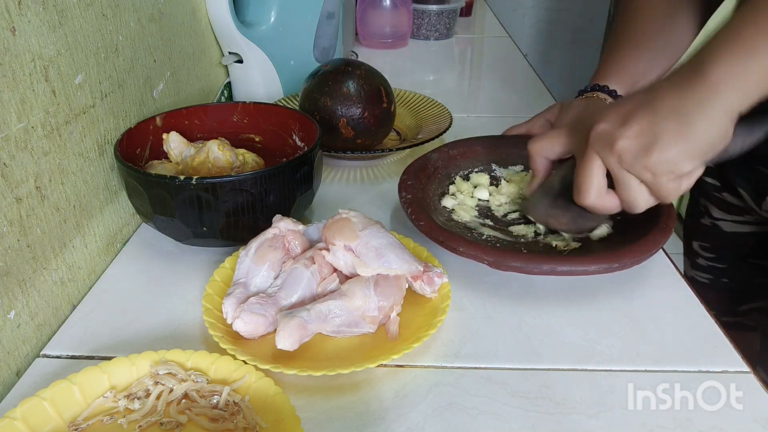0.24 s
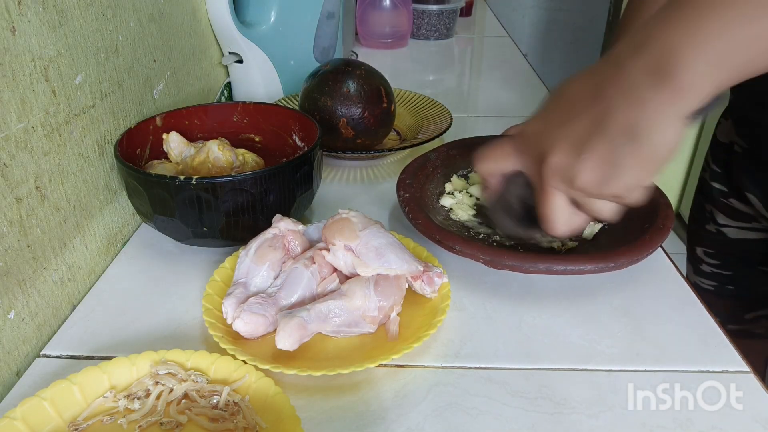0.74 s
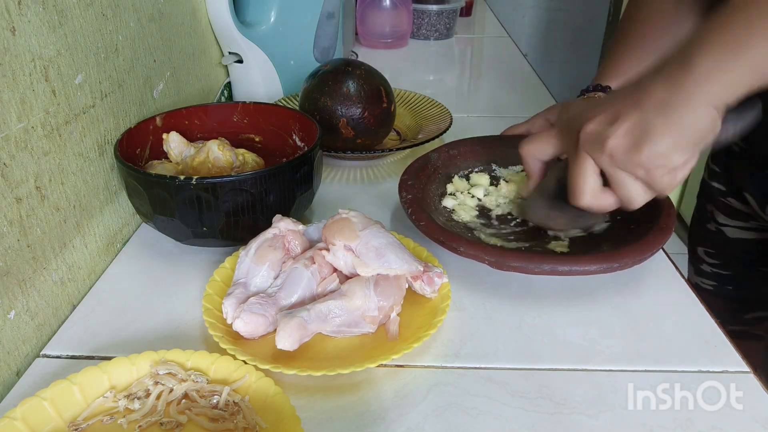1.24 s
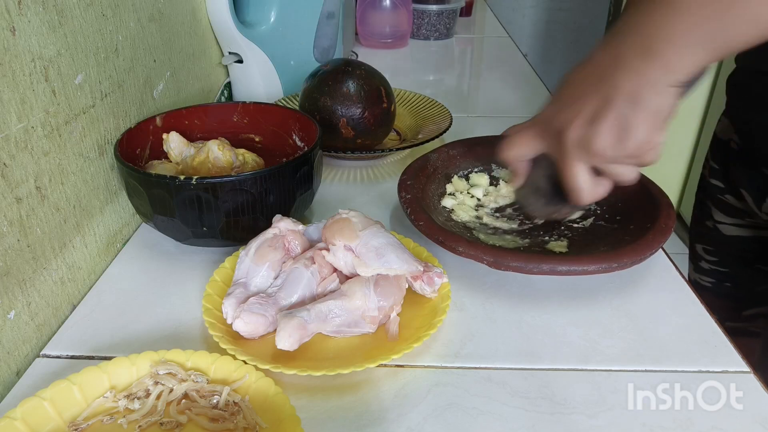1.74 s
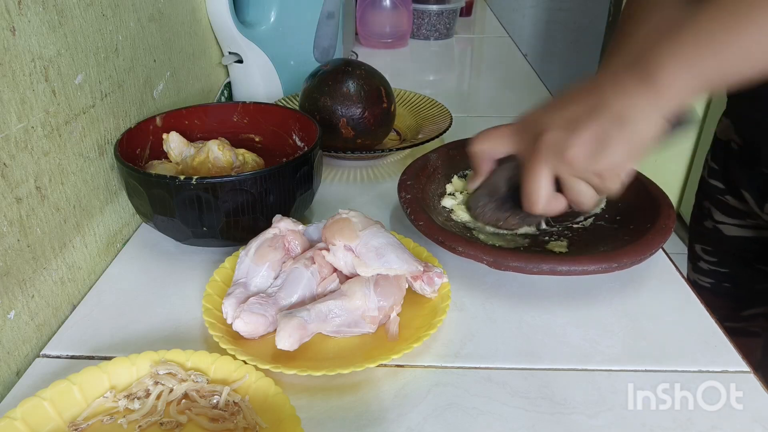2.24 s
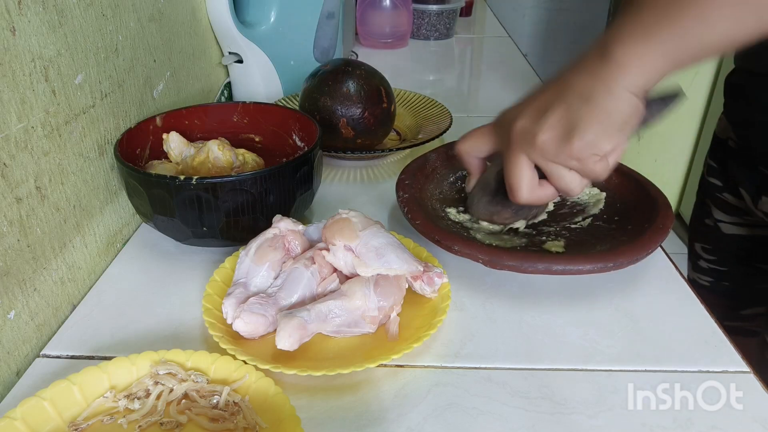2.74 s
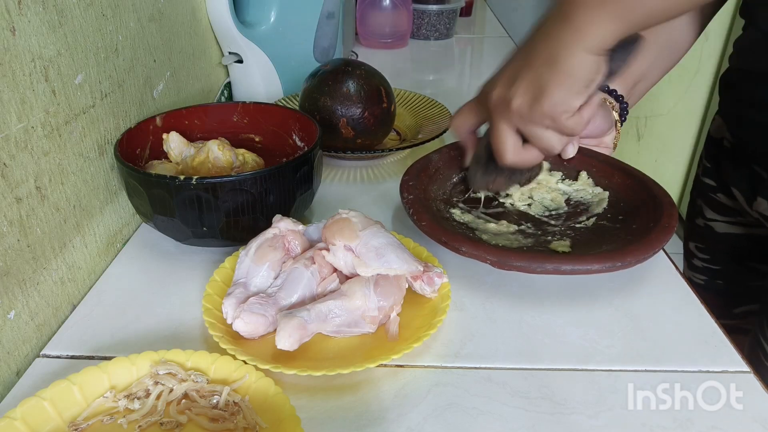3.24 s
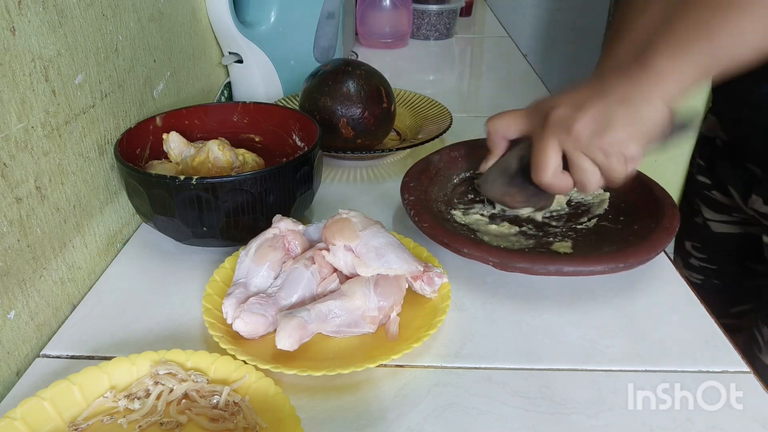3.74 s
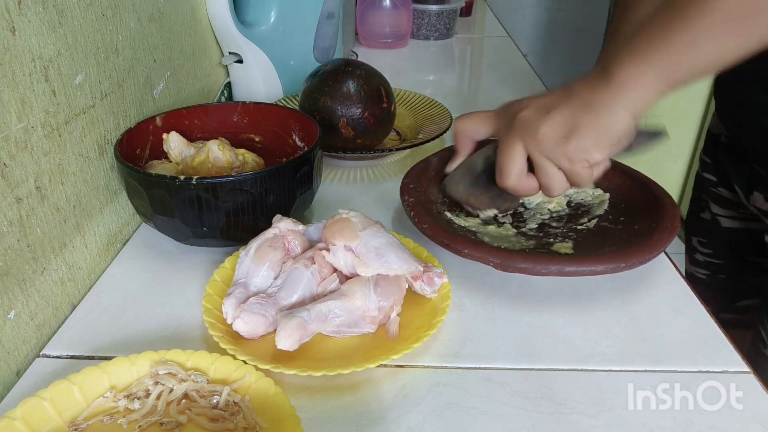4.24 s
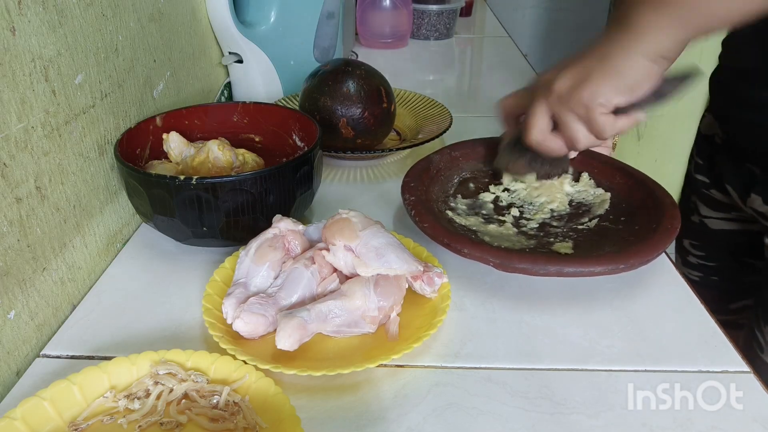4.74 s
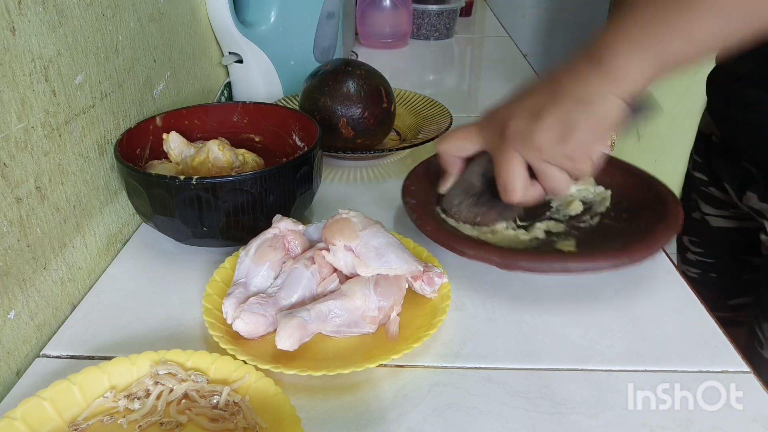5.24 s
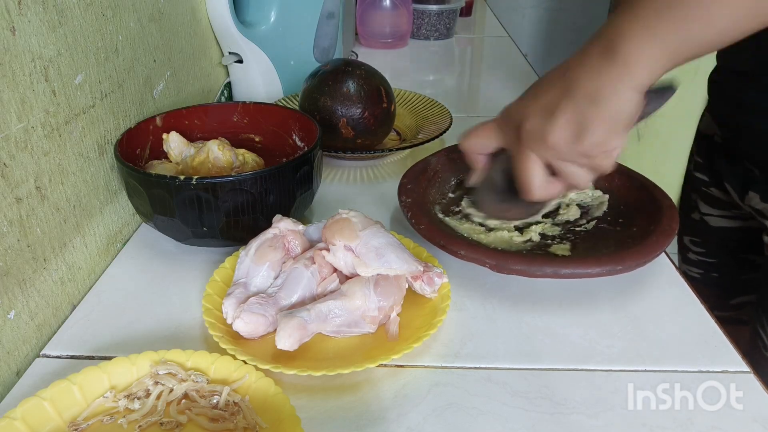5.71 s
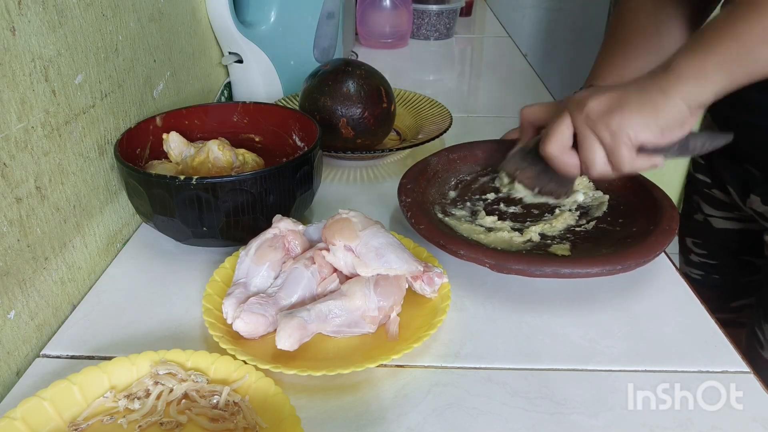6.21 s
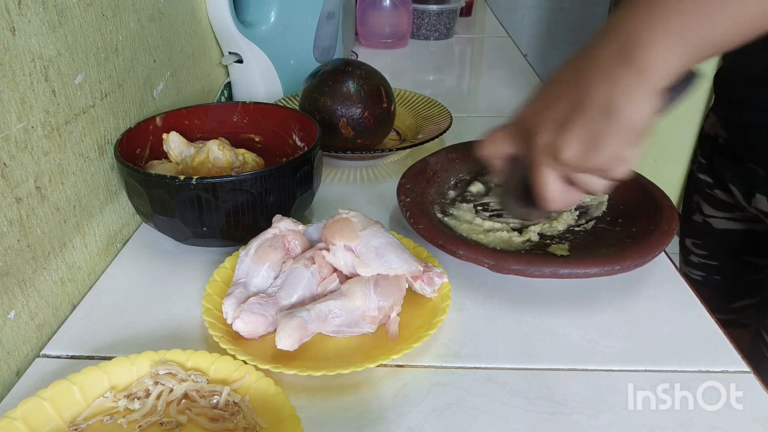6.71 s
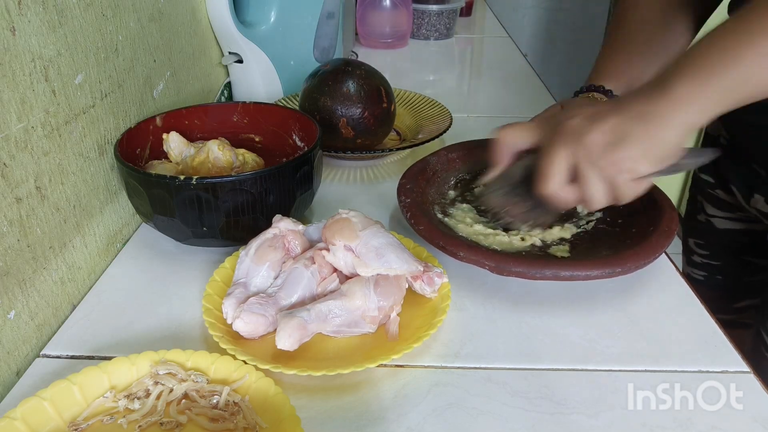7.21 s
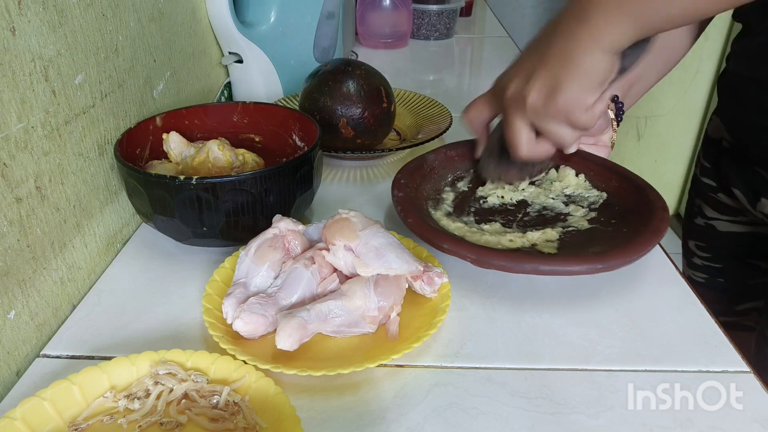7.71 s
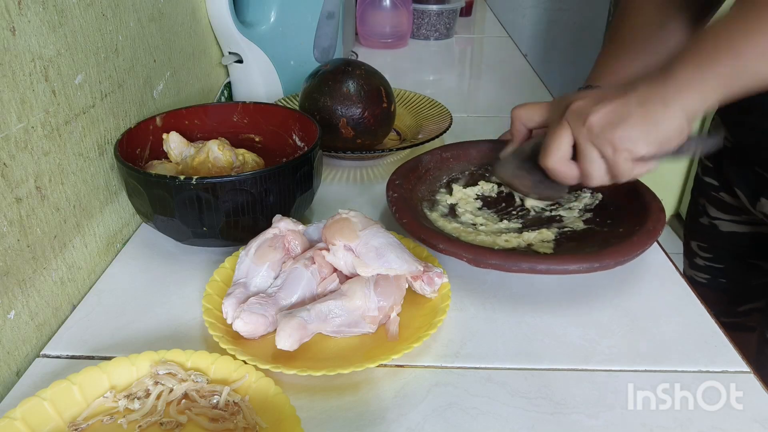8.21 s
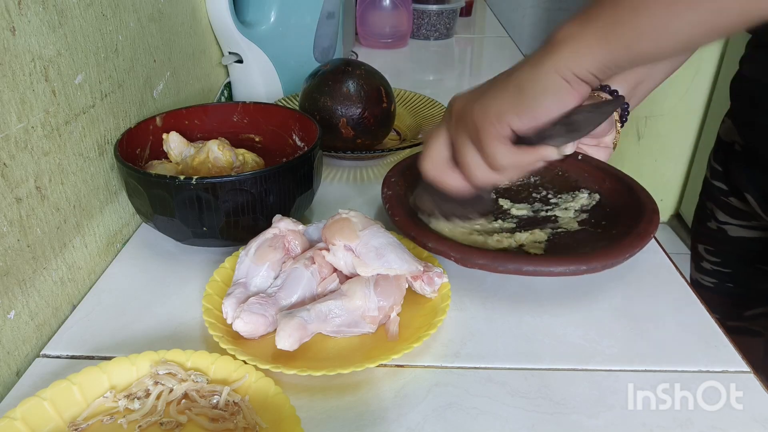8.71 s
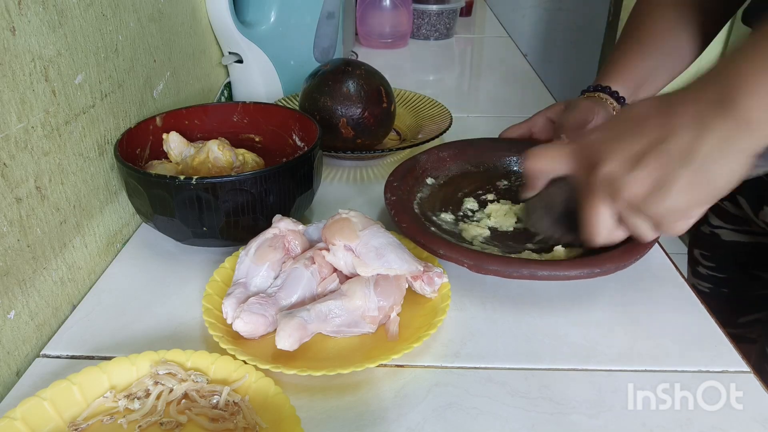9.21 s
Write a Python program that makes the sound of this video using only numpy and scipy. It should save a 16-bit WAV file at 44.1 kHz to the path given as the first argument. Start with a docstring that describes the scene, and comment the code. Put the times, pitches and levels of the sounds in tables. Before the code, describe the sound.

Dry, brittle stone-on-clay rasps open at once and continue in a restless, irregular rhythm to the end. A sharp knock lands around two and a half seconds, heavier blows near five, then denser scraping with clustered clicks and thin squeaks after eight. Paste smears softly beneath. Two close microphones, slightly right-leaning brightness, small hard room.

```python
"""A hand pestle grinds garlic and ginger on a shallow earthenware dish on a tiled kitchen counter.
Stick-slip friction, made of random tiny impulses, gives gritty scrapes, bursts and soft smearing; rolls over the
paste add a hollow gliding resonance. Decaying sines make clicks, noise bands make squeaks, pulses squelch, and
knocks excite the dish's modes while the counter thuds. Each contact reaches two close microphones
through the dish, the tiles and a small room, over quiet room tone."""
import sys
import numpy as np
from scipy import signal
from scipy.fft import rfft, irfft
from scipy.io import wavfile

SR = 44100
rng = np.random.default_rng(int(sys.argv[2]) if len(sys.argv) > 2 else 0)


def waveform_to_disk(signal):
    """Save audio, clipped to [-1, 1], as 16-bit WAV at the path in sys.argv[1]."""
    frames = np.transpose(np.atleast_2d(signal))
    scaled = np.clip(frames, -1, 1) * 32767
    samples = np.round(scaled).astype(np.int16)
    wavfile.write(sys.argv[1], SR, samples)


N = 417186
TAPS = 2048  # samples of a colouring filter

# In all event tables the levels are relative and the starts precede any lag of the function.
# centres of the contact's body, crunch, grit and hiss: hz
CONTACT_HZ = [400, 1100, 3400, 8500]
# the pestle is off the paste: from_s, to_s
LIFTS = [(.72, 0.85), (2.3, 2.45), (3.34, 3.43), (6.75, 6.83)]


def db_to_gain(db):
    """Amplitude ratio: 20 dB is a factor of ten."""
    return 10 ** (np.asarray(db) / 20)


def unit_energy(x):
    """Energy normalisation: the squares sum to 1."""
    return x / np.sqrt(np.sum(x ** 2, axis=-1, keepdims=True) + 1e-18)


def clock(seconds):
    """Uniform sampling: the sample times of a short sound."""
    return np.arange(int(seconds * SR) + 2) / SR


def fade(t, t60):
    """Exponential damping: the level falls by 60 dB in t60 seconds."""
    return np.exp(-np.log(1000) * t / t60)


def add(track, start, sound):
    """Superposition: mix a sound in at its start time, in seconds."""
    i = int(np.clip(start * SR, 0, N - 1))
    track[..., i:i + sound.shape[-1]] += sound[..., :N - i]


def colour(x, hz, gain):
    """Minimum-phase filtering: a folded cepstrum makes the gain curve causal."""
    f = np.maximum(np.fft.rfftfreq(TAPS, 1 / SR), 1)
    log_gain = np.log(np.interp(np.log(f), np.log(hz), gain))
    cepstrum = irfft(log_gain)
    cepstrum[1:TAPS // 2] *= 2
    cepstrum[TAPS // 2 + 1:] = 0
    impulse_response = irfft(np.exp(rfft(cepstrum)))
    return signal.fftconvolve(x, impulse_response)


def shape(x, points):
    """Linear filtering by a table of frequency (Hz) and level (dB), at unchanged length."""
    hz, db = np.transpose(points)
    return colour(x, hz, db_to_gain(db))[:len(x)]


def walk(t, rate):
    """Slow random modulation: normal random levels, rate per second, joined by straight lines."""
    return np.interp(t * rate, np.arange(256), rng.standard_normal(256))


def grains(t, rate, spread_db, catch_rate, catch_db):
    """Stick-slip of rough stone: random impulses, a few far larger, bunched by catching; rms 1."""
    chance = rng.random((3, SR))[:, :len(t)]
    size = db_to_gain(-spread_db * np.log(np.maximum(chance[0], .004)))
    sign = np.sign(chance[2] - .5)
    slips = (chance[1] < rate / SR) * size * sign
    bunching = db_to_gain(catch_db * walk(t, catch_rate))
    return unit_energy(slips * bunching) * np.sqrt(len(t))


def radiate(force, ring_db, tiles_db=4, tiles_t60=0.019, room_db=-1.5, room_t60=0.25,
            shared_hz=400, place_db=2.5, grip_detune=0.015):
    """Modal radiation and reverberation: each contact wakes the modes and meets the tiles in its own way."""
    # mean ringing of dish and pestle, kept for 93 ms: pitch_hz, t60_s, relative level_db
    ringing = [(149.2, 0.35, -20.5), (222.6, 0.3, -16), (298, 0.11, -16), (398, 0.25, -16),
               (464.3, 0.11, -8.5), (844, 0.35, -21.5), (1011, 0.094, -17.5), (1590, 0.17, -31),
               (1950, 0.096, -12.5), (2110, 0.12, -19), (2862, 0.15, -8), (4024, 0.024, -9),
               (5470, 0.0084, -7.5)]
    t = clock(.3)
    hz, t60, db = np.transpose(ringing)[:, :, None]
    # the hands shift each mode by a small share of its pitch
    hz = hz * (1 + grip_detune * rng.standard_normal(hz.shape))
    ring_t = t[:TAPS * 2]
    modes = unit_energy(np.cos(2 * np.pi * hz * ring_t) * fade(ring_t, t60))
    mode_gain = db_to_gain(db + ring_db + place_db * rng.standard_normal(db.shape))
    ring = np.sum(modes * mode_gain, axis=0)
    direct = (t == 0) + np.pad(ring, (0, len(t) - len(ring)))
    # long waves reach both microphones alike, short ones scatter differently
    low, high = (signal.butter(4, shared_hz, kind, fs=SR) for kind in ("low", "high"))
    early, late = rng.standard_normal((2, 2, len(t)))
    diffuse = signal.lfilter(*low, rng.standard_normal(len(t))) + signal.lfilter(*high, late)
    tiles = unit_energy(signal.lfilter(*high, early * fade(t, tiles_t60)))
    room_onset = np.minimum(t / 0.00064, 1)
    room = unit_energy(diffuse * fade(t, room_t60) * room_onset)
    # the dish stands to the right, so the left microphone hears it two samples later
    response = np.array([np.r_[0, 0, direct[:-2]], direct])
    response = response + db_to_gain(tiles_db) * tiles + db_to_gain(room_db) * room
    return signal.fftconvolve(force[None], unit_energy(response), axes=1)


def click(hz, t60, crumble=0.6):
    """Damped impact: the contact rings for an instant while a grain crumbles into noise."""
    t = clock(.03)
    dust = np.diff(rng.standard_normal(len(t) + 1)) * hz / CONTACT_HZ[2]
    return (np.sin(2 * np.pi * hz * t) + crumble * dust) * fade(t, t60)


def crackle(pressure, rate=170, spread_db=3.5, t60=0.0034, low_hz=1800, high_hz=6000):
    """Random brittle fracture: grit cracks at uneven moments, each grain with its own size and pitch."""
    out = np.zeros(N)
    gap, size, pitch = rng.random((3, 56))
    starts = np.cumsum(-np.log(gap)) / rate
    for start, s, p in zip(starts, size, pitch):
        gain = db_to_gain(-spread_db * np.log(max(s, .08)))
        add(out, start, gain * click(low_hz * (high_hz / low_hz) ** p, t60))
    return out[:len(pressure)] * pressure


def scratches(pressure, rate=80, length_s=0.012, low_hz=1400, high_hz=6000,
              glide=0.11, spread_db=2.5, rough=0.092):
    """Frequency-modulated friction: single dragged grains rasp briefly, each at its own gliding pitch."""
    out = np.zeros(len(pressure) + SR)
    gap, size, pitch, bend = rng.random((4, 24))
    starts = np.cumsum(-np.log(gap)) / rate
    t = clock(length_s)
    along = t / t[-1]
    wobble = rough * np.cumsum(rng.standard_normal((len(gap), TAPS)), axis=1)[:, :len(t)]
    for start, s, p, b, w in zip(starts, size, pitch, bend, wobble):
        if start * SR < len(pressure):
            hz = low_hz * (high_hz / low_hz) ** p * (1 + glide * (2 * b - 1) * along)
            rasp = np.sin(2 * np.pi * np.cumsum(hz) / SR + w) * np.sin(np.pi * np.sqrt(along))
            add(out, start, db_to_gain(-spread_db * np.log(max(s, .1))) * rasp)
    return out[:len(pressure)] * pressure


def stroke(length, crest, contact_db, resonances, grain_db=3.0, catch_db=2.0, snap_db=-10, crackle_db=1,
           scratch_db=-9, bite_s=0.0011, release_s=0.011, place_colour_db=3, resonance_width=0.085):
    """Sliding friction: stone on clay, duller and smoother on paste, with ginger fibres snapping throughout."""
    t = clock(min(length + 5 * release_s, .9))
    # it bites, swells to a crest, eases and lets go; pressures are shares of the crest's
    crest_s = np.clip(crest, .1, .95) * length
    pressure = np.interp(t, [0, min(bite_s, crest_s / 2), crest_s, length], [0, .35, 1, .44])
    pressure = pressure * np.exp(-np.maximum(t - length, 0) / release_s)
    body_db, _, grit_db, hiss_db = contact_db
    bare = np.clip(2.0 + (grit_db - body_db) / 30, .3, 1.2)  # how much bare stone touches
    hz = np.geomspace(300, 14000, 128)
    db = np.interp(np.log(hz), np.log(CONTACT_HZ), contact_db)
    for centre, lift_db in resonances:
        db = db + lift_db * np.exp(-(np.log(hz / centre) / resonance_width) ** 2)
    # the pestle travels from one place on the dish to another, and each favours frequencies of its own
    travel, friction = np.minimum(t / length, 1), 0
    for share in (1 - travel, travel):
        slips = grains(t, rate=6000, spread_db=grain_db * bare, catch_rate=207.7, catch_db=catch_db * bare)
        place = db_to_gain(db + place_colour_db * rng.standard_normal(len(hz)))
        force = colour(slips * pressure * np.sqrt(share), hz, place)
        friction = friction + radiate(force, ring_db=-7.5)
    grit = db_to_gain(crackle_db) * crackle(pressure) + db_to_gain(scratch_db) * scratches(pressure)
    add(friction, 0, radiate(grit * db_to_gain(grit_db), ring_db=-6.5, tiles_db=2.0))
    snaps = grains(t, rate=590, spread_db=1.5, catch_rate=55.3, catch_db=8.0)
    snaps = snaps * db_to_gain(snap_db + (grit_db + hiss_db) / 2)
    snap_force = colour(snaps * pressure, CONTACT_HZ, db_to_gain([-7.0, -30.0, 6.5, 4.5]))
    return friction + radiate(snap_force, ring_db=-3, tiles_db=24.0)


def scraping(lean_crunch=0.38):
    """Resonant dry friction: leaning adds body, wet paste adds hiss, the pestle's tilt picks a resonance."""
    # drags across the dish: start_s, length_s, crest (share of length), level_db,
    # extra body from leaning lean_db, extra hiss from wet paste wet_db, resonance tilt_hz, its height tilt_db
    scrapes = [(0, 0.05, 0.94, 13.5, -6, -1, 4130, 9.5), (0.115, 0.1, 0.51, -13, 6.5, 10, 3070, 13),
               (0.23, 0.066, 0.47, -9, 1.5, 8, 3100, 13), (0.301, 0.12, 1, -1, 4.5, 1, 3180, 12),
               (0.483, 0.087, 0.73, 5, -18, -5, 3650, 6), (0.597, 0.12, 0.24, 0.0, -3.5, 2.5, 3830, 7),
               (0.992, 0.089, 1, 2, 2, -2, 3200, 9), (1.283, 0.1, 0.87, -1.5, -5, 5, 3170, 3.0),
               (1.603, 0.097, 0.38, 6.0, -8.5, -4, 4970, 2), (1.739, 0.068, 0.66, 8, -6, -1, 3920, 7),
               (1.892, 0.11, 0.37, 0.5, -7.5, -0.5, 1510, 8), (2.041, 0.057, 0.56, 1.5, 1, 4.5, 3800, 2),
               (2.499, 0.1, 0.64, -3.5, 1, 10, 6460, 7), (2.679, 0.037, 1, -6, -10, 8, 2320, 3),
               (2.801, 0.016, 0.74, -2.0, -9, 0, 2140, 18), (2.967, 0.097, 0.46, -2, -22, -8, 3900, 12),
               (3.518, 0.06, 0.96, 4.5, -3, 7.5, 4660, 6), (3.639, 0.14, 0.4, -10.5, 4, -1, 2620, 9),
               (3.808, 0.07, 0.22, 8.0, -18, -9, 2450, 10.5), (4.162, 0.084, 1, 4, -10.5, 3.5, 3320, 6),
               (4.329, 0.089, 0.42, 6, -1.5, -9, 4550, 3.5), (4.481, 0.059, 0.71, 8, -26, -8, 2440, 7),
               (4.895, 0.028, 0.74, 16.5, -7.5, -3, 2780, 10.5), (4.965, 0.15, 0.75, 3, -10.5, -2, 2850, 1),
               (5.158, 0.14, 0.35, -5, -5.5, 4, 2440, 4.5), (5.303, 0.099, 0.19, 8.5, -4.5, -16, 1660, 9),
               (5.4, 0.041, 0.43, -0.5, -9, -11, 4630, 9), (5.582, 0.08, 0.99, 12.5, -14, -14.5, 2230, 11),
               (5.742, 0.063, 0.35, 5, -14, -10, 2880, 8.5), (5.861, 0.094, 1, 8, -14.5, -9, 1520, 4.0),
               (6.253, 0.062, 0.97, 9, -14.5, -11, 3280, 13), (6.415, 0.043, 0.81, 6, -15, -8, 1810, 2),
               (6.578, 0.062, 0.33, 7, -23, -7.5, 1800, 13), (6.906, 0.09, 0.58, 6.0, -8, -3.5, 2080, 7.5),
               (7.045, 0.083, 0.8, 3.0, 0, -1.5, 3900, 1), (7.208, 0.091, 0.42, -2.5, -5.5, 4.5, 2350, 12),
               (7.342, 0.099, 0.77, 7, -4.5, -8.5, 1980, 3), (7.474, 0.11, 0.73, 0.5, 1, -0.5, 3900, 6.5),
               (7.902, 0.038, 0.87, 2.5, -2, 4.5, 4630, 10), (7.946, 0.078, 0.55, 13, -10.5, -7, 1620, 8),
               (8.097, 0.074, 0.54, 8.5, -6, -5, 1880, 6), (8.216, 0.12, 0.19, 6.5, -7, -15.5, 6160, 3),
               (8.413, 0.082, 1, -2.5, -0.5, -3.5, 1830, 10), (8.589, 0.11, 0.87, 5, 0.5, -16, 3240, -7),
               (8.689, 0.12, 0.68, 6, 3, -19, 5340, 1), (8.777, 0.14, 0.4, 3, -9, -6.5, 5470, -9),
               (8.985, 0.13, 0.63, -6.5, -2, -1, 3240, 13.5), (9.364, 0.15, 0.42, 7.5, -4, -2.5, 2900, 1)]
    # force of a drag: body_db, crunch_db, grit_db, hiss_db
    scrape_force = np.array([-0.3, -1.1, -2, 0.88])
    out = np.zeros((2, N))
    for start, length, crest, db, lean_db, wet_db, tilt_hz, tilt_db in scrapes:
        # part of the extra body also reaches the crunch band
        contact_db = db + scrape_force + [lean_db, lean_crunch * lean_db, 0, wet_db]
        add(out, start, stroke(length, crest, contact_db, [(tilt_hz, tilt_db)]))
    return out


def smearing(waver_db=1.5, waver_rate=18, lift_s=0.013):
    """Continuous friction noise: the pestle smears paste softly except where it is lifted off."""
    # force of the faint sliding: body_db, crunch_db, grit_db, hiss_db
    smear_force = [-16, -29.5, -21, -15]
    t = np.arange(N) / SR
    touch = np.ones(N)
    for up, down in LIFTS:
        touch = touch * np.where(t < down, np.clip((up - t) / lift_s, 0, 1), 1)
    slips = rng.standard_normal(N) * touch * db_to_gain(waver_db * walk(t, waver_rate))
    return radiate(colour(slips, CONTACT_HZ, db_to_gain(smear_force)), ring_db=-6.0)[:, :N]


def kitchen_air(db=-56):
    """Diffuse noise field: a soft, steady room tone, mostly alike on both sides."""
    # spectrum of the still air: frequency_hz, relative level_db (per Hz)
    air = [(30, -4), (100, 5), (160, 7.5), (400, -13), (800, -8), (2500, -23), (6000, -26), (16000, -39)]
    mid, side = (unit_energy(shape(rng.standard_normal(N), air)) * np.sqrt(N) for _ in range(2))
    return db_to_gain(db) * (mid + side * np.array([[.2], [-.2]]))


def thudding(lag=0.00667, t60=.12, foot_t60=0.16, rattle=0.42, gain_db=1):
    """Damped low resonance: the counter answers the rocking dish, whose foot rattles."""
    # the dish rocks: start_s, relative level_db, pitch_hz
    thuds = [(0.01,-35,120), (0.83,-42,115), (1.033,-38,100), (1.348,-34,105), (1.904,-32.5,100),
             (2.228,-38.5,150), (2.516,-29,140), (2.713,-40,110), (3.005,-35,100), (3.305,-32.5,100),
             (3.434,-29.5,115), (3.563,-24,115), (3.813,-39,120), (4.198,-25.5,115), (4.895,-16,100),
             (5.027,-28,130), (5.336,-28,100), (5.462,-29,105), (5.6,-37,125), (6.228,-37,110),
             (6.534,-34.5,130), (7.64,-38,140), (8.259,-42,110), (8.322,-24.5,125), (8.642,-27,186),
             (8.729,-27,196)]
    # spectrum of the foot's rattle: multiple of the thud's pitch, relative level_db (per Hz)
    foot_spectrum = [(.3, -47), (.68, -4.5), (1.4, -7.5), (2.4, -16), (5.5, -33), (18, -55)]
    out, t = np.zeros(N), clock(.3)
    for start, db, hz in thuds:
        note = np.sin(2 * np.pi * hz * t) * fade(t, t60)
        foot = shape(rng.standard_normal(len(t)), np.array(foot_spectrum) * [hz, 1])
        foot = foot / foot.std() * fade(t, foot_t60)
        add(out, start + lag, db_to_gain(db + gain_db) * (note + rattle * foot))
    return out


def catching(grain_db=3.0, bunch_db=0.5, rise_s=0.0029, fade_s=0.011):
    """Sudden stress release: a hard bit is crushed in a quickly fading burst of slips."""
    # hard bits: start_s, level_db, extra hiss wet_db
    catches = [(0.315,12.5,-1), (.994,18.5,3.5), (1.334,15.5,-11), (1.611,22,1.5), (1.771,20,-12),
               (1.907,17.5,3.5), (1.968,12.5,-8), (2.703,19,-5), (2.92,6.5,1), (3.003,12.5,-0.5),
               (3.286,13.5,-2), (3.524,-2,2), (3.733,16.5,-1.5), (3.8175,15,5.5), (4.236,-3,7),
               (4.903,17,-1), (5.206,15,0), (5.448,15,-8), (5.928,-5,-14), (6.57,4.5,11), (6.721,9.5,-12.5),
               (6.908,14,6), (7.231,18,-17), (7.488,19,0), (8.418,-14,19), (8.432,14,-7)]
    # force of a catch: body_db, crunch_db, grit_db, hiss_db
    catch_force = np.array([-9.5, -9.5, -2, -4.5])
    out, t = np.zeros((2, N)), clock(.07)
    pressure = np.minimum(t / rise_s, 1) * np.exp(-t / fade_s)
    for start, db, wet_db in catches:
        slips = grains(t, rate=7400, spread_db=grain_db, catch_rate=375, catch_db=bunch_db)
        burst = unit_energy(slips * pressure) * np.linalg.norm(pressure)
        force = colour(burst, CONTACT_HZ, db_to_gain(db + catch_force + [0, 0, 0, wet_db]))
        add(out, start, radiate(force, ring_db=-9.5, tiles_db=4.5))
    return out


def rub(length, crest, pitches, width):
    """Noise-driven resonance: a band swells to a crest and glides through the pitches as the pestle tilts."""
    t = clock(length)
    course = np.interp(t / length, [0, np.clip(crest, .1, .9), 1], [0, .5, 1])
    hz = np.interp(course, np.linspace(0, 1, len(pitches)), pitches)
    phase = 2 * np.pi * np.cumsum(hz) / SR
    # slow noise on two carriers makes a band whose width is a share of the pitch
    lowpass = signal.butter(2, width * hz.mean() / 2, fs=SR)
    slips = signal.lfilter(*lowpass, rng.standard_normal((2, SR)))[:, TAPS:TAPS + len(t)]
    note = (slips[0] * np.cos(phase) + slips[1] * np.sin(phase)) * np.sin(np.pi * course)
    return radiate(unit_energy(note) * np.sqrt(len(t)), ring_db=-18, tiles_db=-2.0, room_db=-7)


def rolling(gain_db=-2, width=0.25, overtone_width=0.58, arch_ratio=1.12, overtone_ratio=2.15):
    """Cavity resonance: the gap under a rolling pestle sounds a hollow note and overtone, gliding with the push."""
    # rolls over the paste: start_s, length_s, crest (share of length), friction_db, relative note_db,
    # first_hz, last_hz, overtone_db (against the note)
    rolls = [(0.36,0.11,0.37,-15,-24.5,334,231,-7), (0.467,0.1,0.17,-14,-11.5,526,343,-8),
             (0.872,0.094,0.85,-16,-33,420,377,6), (1.144,0.11,0.87,1.5,-15,441,522,2),
             (1.423,0.13,0.41,1.5,-12.5,341,412,-1), (1.748,0.084,0.51,-15,-12.5,398,279,-33),
             (2.165,0.14,0.52,-4,-15,287,307.6,0), (2.834,0.065,0.28,-3,-17.5,574,417,-1),
             (3.187,0.14,0.62,-11.5,-16,321.7,534,3), (3.897,0.17,.6,-1,-16.5,402,481.5,5),
             (4.616,0.17,0.69,0.5,-19,421.5,505.5,8.5), (6.009,0.12,0.55,-2,-21.5,398,554,5.5),
             (6.109,0.16,0.21,-3.5,-22,527,352,-6), (7.617,0.15,0.17,-6.5,-23,370,431,1),
             (8.755,0.2,0.38,-12,-14.5,520.4,402,7), (9.158,0.18,0.46,-8.5,-22.5,321,379,-17)]
    # force of a roll: body_db, crunch_db, grit_db, hiss_db
    roll_force = np.array([-4.5, -8, -2, -4])
    # dip and resonances of the rolling contact: pitch_hz, level_db
    roll_resonances = [(2330, -8), (3850, 2), (5350, 0.5)]
    out = np.zeros((2, N))
    for start, length, crest, friction_db, note_db, first_hz, last_hz, overtone_db in rolls:
        arch = np.array([first_hz, arch_ratio * (first_hz + last_hz) / 2, last_hz])
        note = rub(length, crest, arch, width)
        overtone = rub(length, crest, overtone_ratio * arch, overtone_width)
        note = note + db_to_gain(overtone_db) * overtone
        add(out, start, stroke(length, crest, friction_db + roll_force, roll_resonances))
        add(out, start, db_to_gain(note_db + gain_db) * note)
    return out


def clicking():
    """Impact excitation: the pestle slips off a grain and clicks on bare clay."""
    # start_s, level_db, pitch_hz, t60_s
    clicks = [(.841,-5,4600,0.034), (1.9711,17.5,5460,0.01), (2.4407,17,955,0.0048), (2.444,12,4830,0.012),
              (2.923,6,4200,0.0073), (0.9712,9.5,5120,0.012), (1.3375,10.5,3080,0.0091),
              (1.89,11,5400,0.0038), (1.912,15,4470,0.0066), (0.423,3,5500,0.0037), (3.465,-3,3900,.008),
              (0.8405,3,1300,.006), (5.032,11,980,0.0091), (5.537,2,1300,.006), (8.51,8,4200,.004),
              (8.5135,5,1180,0.0059), (8.4175,7,5000,.006), (3.535,25,4950,0.0037), (3.8205,15,4170,0.013),
              (4.237,19,3300,0.0056), (4.502,10,3720,0.0037), (4.5073,16,4360,0.009), (4.53,17,4020,0.0048),
              (4.895,28,3380,0.012), (5.3385,29.5,1540,0.0046), (5.4663,16.5,1010,0.0078),
              (5.646,6,2670,0.006), (6.5725,12,3090,0.0069), (6.91,14.5,2700,0.0025),
              (6.9653,14,3960,0.0045), (8.4383,-3,2740,.007), (8.607,14,4190,.005),
              (8.612,16.5,4330,0.0044), (8.6205,13,3400,0.0065), (8.629,19,4350,.005),
              (8.6457,15,2940,.006), (8.662,19.5,3200,0.007), (8.725,19.5,2900,0.0059),
              (8.949,6,2900,0.015), (9.071,7,3360,0.0062)]
    out = np.zeros((2, N))
    for start, db, hz, t60 in clicks:
        sound = db_to_gain(db) * click(hz, t60)
        add(out, start, radiate(sound, ring_db=-15.5, tiles_db=0.0, room_db=-2.5))
    return out


def pestle_ring(db):
    """Free modal vibration: swung down hard after a lift, the loosely held pestle rings for a moment."""
    # pitch_hz, t60_s, relative level_db
    pestle_modes = [(2040, 0.027, -16), (2580, .07, -23), (3140, 0.044, -22.5), (5100, 0.081, -19.5),
                    (5460, 0.028, -29.5), (7500, .12, -30)]
    t = clock(.2)
    ring = 0
    for hz, t60, mode_db in pestle_modes:
        ring = ring + db_to_gain(db + mode_db) * np.sin(2 * np.pi * hz * t) * fade(t, t60)
    return radiate(ring, ring_db=-24, tiles_db=-9, room_db=0)


def knocking(lag=0.000933, push=5, chatter=0.86, hiss_db=-11.5, landing_s=.05, hard_landing_db=22):
    """Impulsive contact: a hard blow, then chatter as the pestle settles and crushes grit; the dish rings."""
    # start_s, level_db, extra body_db, extra treble_db of a hard contact, chatter_t60_s
    knocks = [(0.8399,14.5,4,-17,0.079), (2.441,29.5,-4,-14,0.057), (2.506,11,4,-10,.06),
              (2.521,11.5,9,-20,0.054), (3.157,-9,10,2.5,0.18), (3.431,10,-1.5,-19,0.043),
              (3.561,22.5,-21,-0.5,0.062), (3.623,14,-10,-22,0.032), (4.842,-1.5,3,-22,0.77),
              (5.028,14.5,2,-38,0.17), (5.338,35,-21,-9.5,0.015), (5.467,16,1,-30,0.044),
              (5.536,7,4,-15,0.023), (5.613,11.5,4.5,-2,0.071), (7.728,20,-8,-8,0.082),
              (7.75,17.5,-3.5,-12,0.17), (7.781,7.5,1.5,-9,0.29), (8.266,17.5,-4.5,-24,0.19),
              (8.511,6,3.5,-20,0.094), (8.549,17,-3.5,-2.5,0.1), (8.622,17.5,-6.5,-6.5,0.15),
              (8.725,19,-6,-14,0.2)]
    out, t = np.zeros((2, N)), clock(.2)
    for start, db, body_db, treble_db, chatter_t60 in knocks:
        settling = fade(t, chatter_t60)
        slips = grains(t, rate=4200, spread_db=-0.2, catch_rate=810, catch_db=4.5)
        blow = chatter * unit_energy(slips * settling) * np.linalg.norm(settling)
        blow[0] += push
        contact_db = db + np.array([body_db, 0, treble_db, treble_db + hiss_db])
        force = colour(blow, CONTACT_HZ, db_to_gain(contact_db))
        add(out, start + lag, radiate(force, ring_db=-8.0, tiles_db=0.5))
        ends_lift = any(abs(start - down) < landing_s for _, down in LIFTS)
        if db > hard_landing_db and ends_lift:
            add(out, start + lag, pestle_ring(db))
    return out


def squelching(gain_db=-1):
    """Random pulse excitation: wet garlic squelches out from under the pestle in tiny bright pops."""
    # start_s, length_s, relative level_db
    squelches = [(1.054, 0.055, 5), (2.253, 0.027, 0.5), (3.326, 0.014, -9.5), (3.36, 0.033, -11),
                 (3.412, 0.036, -11), (3.906, 0.023, -1), (4.083, 0.029, -3.5), (4.165, 0.027, 8),
                 (4.823, 0.1, 0.5), (5.547, 0.043, 0.5), (5.84, 0.022, -1.5), (7.882, 0.074, 1),
                 (8.225, 0.034, 5)]
    out, bright = np.zeros((2, N)), db_to_gain([-50, -55, -3.5, 4.0])
    for start, length, db in squelches:
        t = clock(length)
        pops = grains(t, rate=2000, spread_db=5.0, catch_rate=86, catch_db=2.5) * np.sqrt(np.hanning(len(t)))
        force = colour(pops, CONTACT_HZ, bright * db_to_gain(db + gain_db))
        add(out, start, radiate(force, ring_db=-19))
    return out


def squeaking(sag=0.0193):
    """Friction-driven resonance: dragged bare stone squeaks thinly, sagging by a small share of its pitch."""
    # start_s, length_s, first pitch_hz, level_db, width (share of the pitch)
    squeaks = [(1.66,0.0265,4870,0,0.28), (2.052,0.039,4010,-2.5,0.089), (3.511,0.045,3590,0,0.15),
               (6.265,.069,3260,-3,0.14), (6.53,0.035,2950,-15.5,0.6), (7.067,0.066,4030,-8,0.043),
               (7.536,0.035,2960,-5,0.13), (7.768,0.11,1087,-13,0.12), (7.874,.11,1085,-11,0.26),
               (7.961,0.071,1994,-7.5,0.41), (8.11,0.057,1902,0.5,0.18), (8.548,0.064,1950,-9,0.15),
               (8.685,0.068,5340,-9.5,.05), (8.8,0.111,5670,-15,.14), (8.94,0.17,2870,-24,.022)]
    out = np.zeros((2, N))
    for start, length, hz, db, width in squeaks:
        add(out, start, db_to_gain(db) * rub(length, 0.55, [hz, hz * (1 - sag)], width))
    return out


def ears(pair):
    """Microphone directivity: each faces its own way and favours its own bands."""
    # left minus right: frequency_hz, level_db
    balance = [(100, 1), (280, 3), (480, 3.5), (650, -6.5), (950, -1.5), (1400, -3), (2300, -6.5),
               (4000, -5), (5500, -4.5), (8000, -2), (12000, 2), (16000, 4)]
    hz, db = np.transpose(balance)
    f = np.maximum(np.fft.rfftfreq(2 * N, 1 / SR), 1)
    lean_db = np.interp(np.log(f), np.log(hz), db) * np.array([[1], [-1]]) / 2
    return irfft(rfft(pair, 2 * N) * db_to_gain(lean_db))[:, :N]


def scene(dish_db=-16.5, lowest_hz=64):
    """Source-filter superposition: all contacts take the dish's colour, over its thuds and the room tone."""
    # broad colour of the dish: frequency_hz, relative level_db (per Hz)
    dish_colour = [(35, -36.5), (60, -37), (100, -4), (200, -6), (400, -6), (600, -10), (1000, -10),
                   (2000, -13), (2380, -14), (2650, -12), (3200, -14), (3550, -17.5), (4000, -14.5),
                   (5400, -14), (5850, -16.5), (6350, -21.5), (7800, -21.5), (8600, -28.5), (9900, -26.5),
                   (12000, -34.5), (16000, -36)]
    contact = scraping() + rolling() + squeaking() + catching()
    contact = contact + clicking() + squelching() + knocking() + smearing()
    dish = np.array([shape(side, dish_colour) for side in contact])
    # the thuds carry little of their energy below lowest_hz
    thuds = signal.lfilter(*signal.butter(3, lowest_hz, "high", fs=SR), thudding())
    return ears(db_to_gain(dish_db) * dish + thuds) + kitchen_air()


def record(dry, top_hz=15800):
    """Saturation and band-limiting: the recorder clips at full scale, then a low-pass cuts the top."""
    lowpass = signal.ellip(8, .2, 70, top_hz, fs=SR, output="sos")
    return signal.sosfilt(lowpass, np.clip(dry, -1, 1))


dry = scene()
out = record(dry)
waveform_to_disk(out)
```